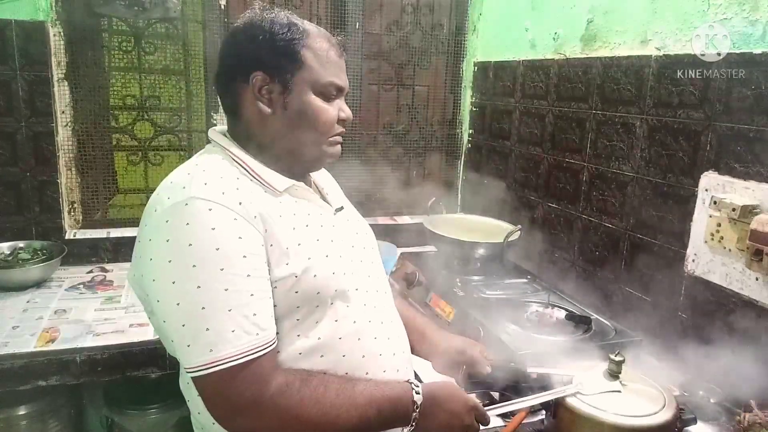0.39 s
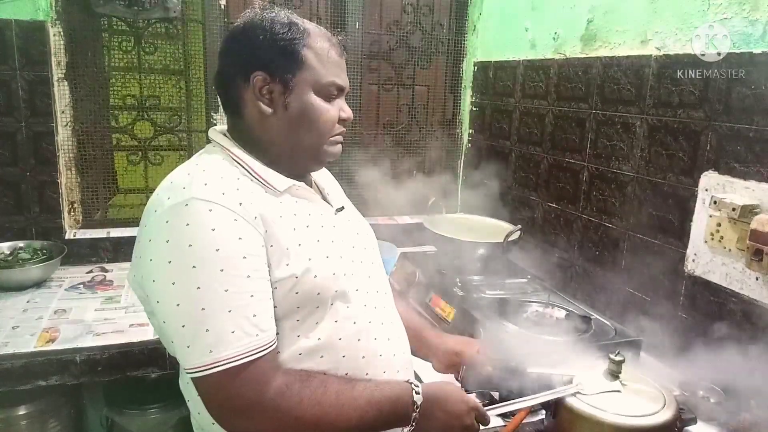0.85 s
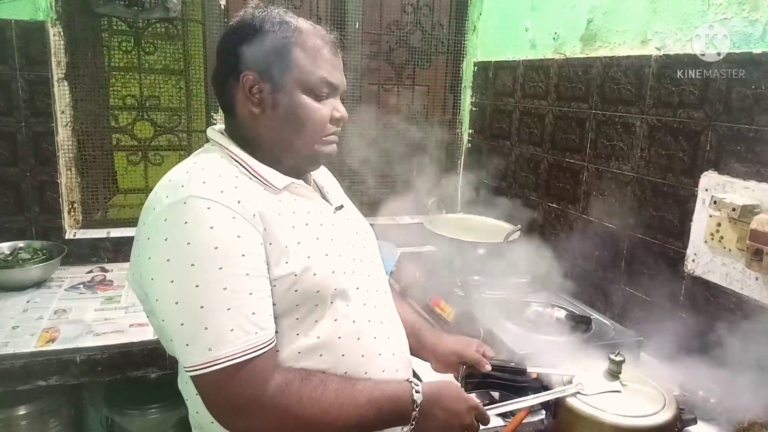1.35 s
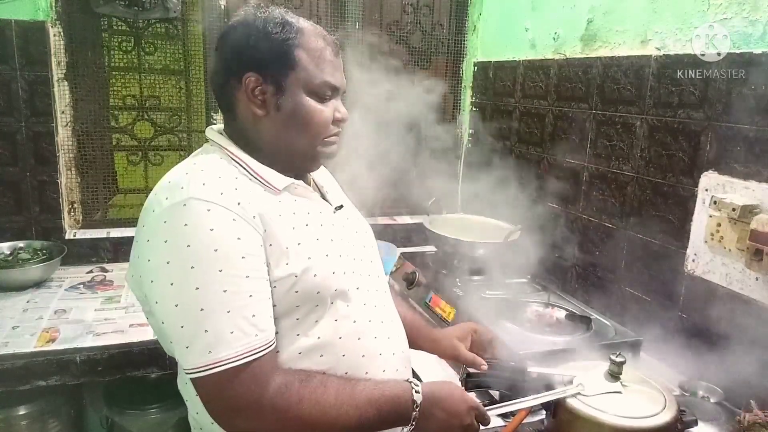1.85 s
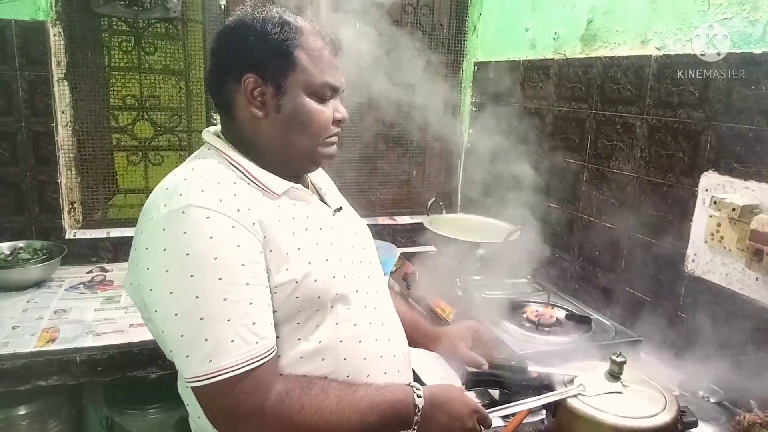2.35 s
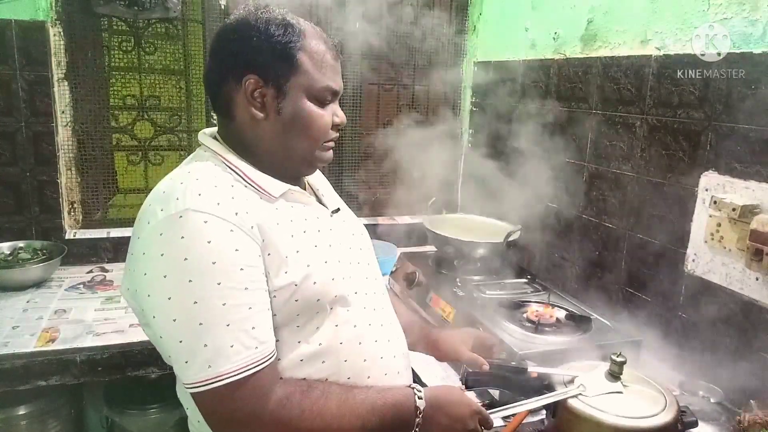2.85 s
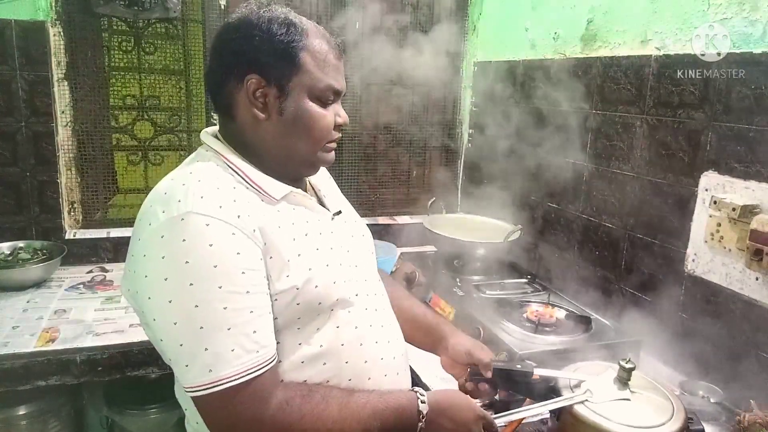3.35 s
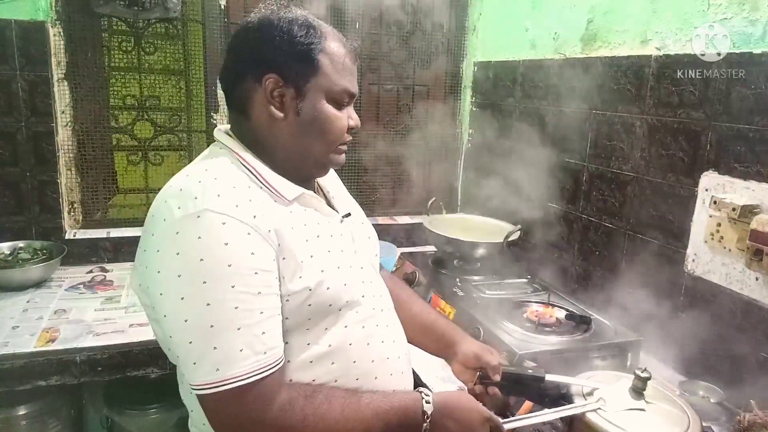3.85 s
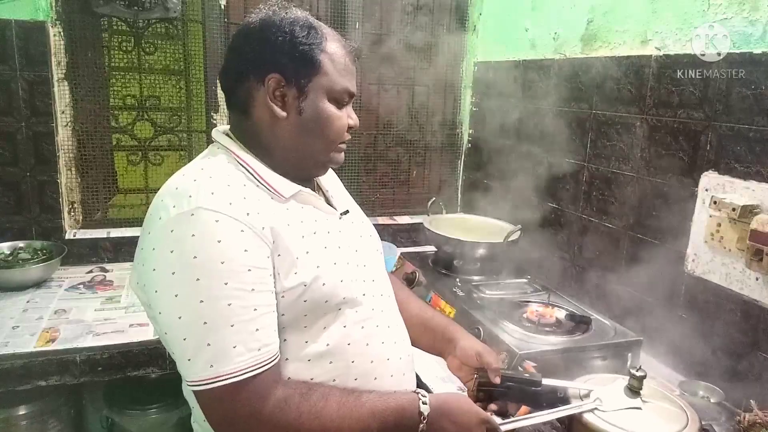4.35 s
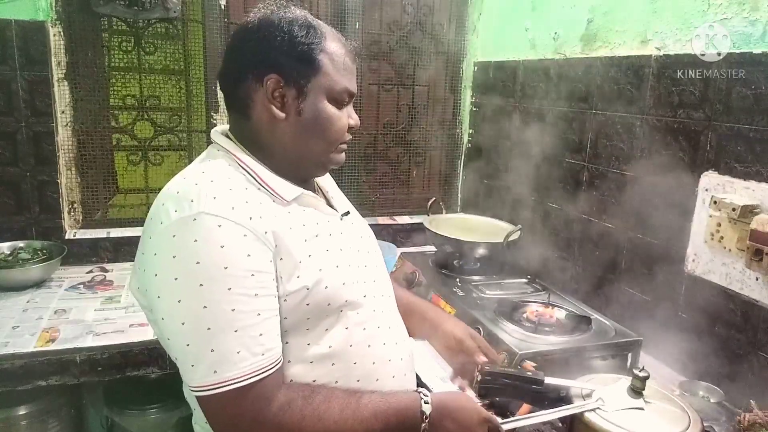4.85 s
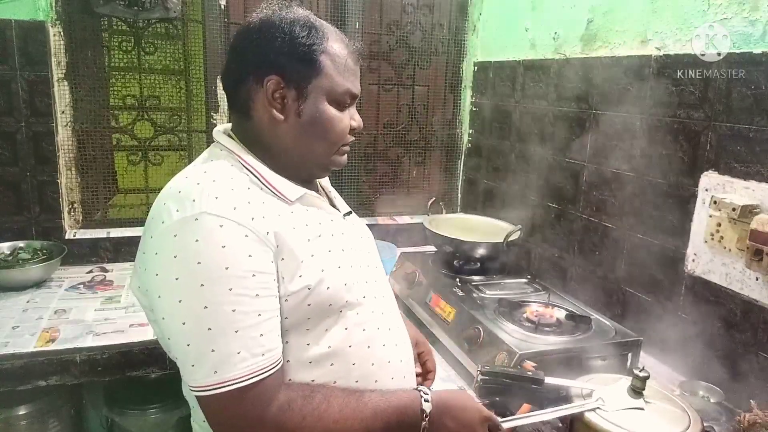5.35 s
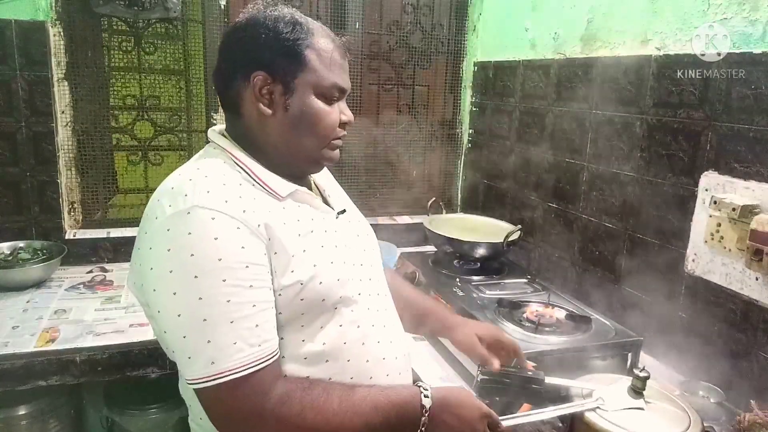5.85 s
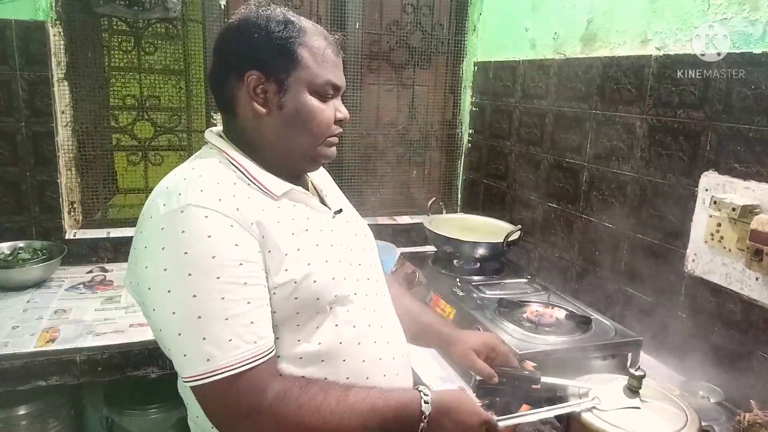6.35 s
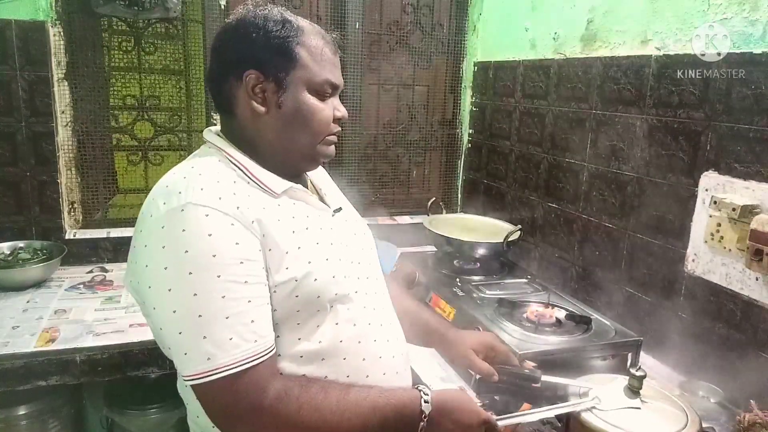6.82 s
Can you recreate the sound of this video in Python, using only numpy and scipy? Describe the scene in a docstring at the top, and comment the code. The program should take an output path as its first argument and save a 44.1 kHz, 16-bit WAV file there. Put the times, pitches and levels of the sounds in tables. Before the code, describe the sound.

A pressure cooker releases a sharp, dense rush of steam close to the microphone. It starts somewhat softer and uneven, broken by several low bubbling puffs under the lid, and swells within two seconds to a full continuous hiss. The hiss wavers slightly, duller around the middle, brighter later, and is still running at the end. Tiles and steel add a short metallic reflection; the stove flame is barely audible.

```python
"""Steam jet of a pressure cooker

Steam escapes under the lifted weight of a pressure cooker in a small tiled kitchen; both channels are alike.
The jet is noise coloured by resonances of vent, weight and metal; the pose of the weight shifts its colour.
Early on it sputters: low puffs ring the hollow under the lid, mostly while the hiss dips.
A gas burner and the house murmur beneath as low noise; random tails of tiles and steel comb the hiss finely.
"""
import sys
import numpy as np
from scipy import signal
from scipy.fft import rfft, irfft, next_fast_len
from scipy.io import wavfile
from scipy.ndimage import uniform_filter1d

SR = 44100
rng = np.random.default_rng(int(sys.argv[2]) if len(sys.argv) > 2 else 0)


def level_to_linear(level):
    """Convert decibel levels to linear amplitude factors, elementwise."""
    exponent = np.asarray(level, float) / 20
    return 10 ** exponent


def bounce(signal):
    """Save signal as a 16-bit WAV file at the path given by the first command-line argument."""
    frames = np.transpose(np.atleast_2d(signal))
    limited = np.clip(frames, -1, 1)
    pcm = np.round(limited * 32767).astype(np.int16)
    wavfile.write(sys.argv[1], SR, pcm)


N = 317961

# spectral density of burner and house before low-pass and scaling: f/Hz, relative level/dB
BURNER_COLOUR = [(15, -43), (25, -16), (48, -13), (75, -9.5), (128, -0.5), (147, 1.5), (168, -13),
                 (195, -2.5), (270, -5.5), (299, 0), (400, 2.5), (520, -31), (880, -120)]
# burner and house, level about which they flicker: t/s, level/dB
BURNER_LEVEL = [(0, -76), (.2, -76), (.3, -70), (.62, -71), (.72, -64), (1.0, -66.5), (7.21, -66.5)]
# slugs of water in the vent: start t/s, hold t/s, puff level/dB, change of hiss/dB, upper modes/dB
SLUGS = [(0.232, 0.17, -54.5, 0.5, -8), (0.647, 0.028, -47, -2, -1), (0.726, 0.03, -45.5, -2.5, -3),
         (1.078, 0.042, -43.5, -2, -8), (1.354, .07, -46.5, -1, 1), (1.575, .02, -44.5, -4.5, 0),
         (1.907, 0.039, -50.5, 0, -3), (2.26, .02, -49, -2.5, -4)]
# resonances of the hollow under the lid: f/Hz, width/Hz, relative level/dB
HOLLOW_MODES = [(196, 47, -10), (350, 27, -11), (480, 27, 1.5), (575, 53, -1), (687, 23, 3.5), (975, 40, 2),
                (960, 77, 1.5), (1270, 300, 3.5)]
# spectral density of the turbulent jet before its resonances: f/Hz, relative level/dB
JET_COLOUR = [(120, -72), (200, -33), (267, -33.5), (364, -30), (564, -25.5), (921, -20), (1010, -22),
              (1280, -12), (2010, -10), (2590, -3.5), (3000, -0.5), (5990, -11), (8300, -9), (13300, -15),
              (15400, -20.5)]
# broad resonances and dips of vent and weight: f/Hz, width/Hz, lift/dB
VENT = [(2980, 950, 1.5), (6330, 460, -1), (6940, 280, 4), (7070, 310, -4), (8070, 1300, 3),
        (9150, 460, -2.5), (10100, 840, 1.5), (10970, 500, -0.5), (13100, 1500, 1.5)]
# narrow rings and dips of lid, pans and steel hob: f/Hz, width/Hz, lift/dB
RINGS = [(660, 27, 2), (923, 23, 3.5), (1394, 10, 3), (2520, 10, -4), (2583, 30, 7), (3008, 41, 3.5),
         (3344, 30, 3.5), (4195, 30, 4.5), (4630, 27, 4.5), (5480, 28, 3), (5660, 37, 4.5), (6110, 25, 6.5),
         (6570, 34, 6.5), (6900, 30, 0.5), (7500, 30, -8)]
# pose of the lifted weight: t/s, brightness/dB, tilt/1, turn/1
POSE = [(0, -0.3, .5, -.3), (.3, 1.3, -0.19, -0.88), (.9, 1.5, -0.3, -.7), (1.6, 2, .3, -0.89),
        (2.0, 1, 1.1, -0.74), (2.7, -0.5, -.2, -1.1), (3.1, -1.8, 1, -0.9), (3.8, -3, 0, 0.36),
        (4.4, -0.5, -0.14, 0.25), (4.9, -1, 0.19, 1.3), (5.4, 1.5, 1.9, 2), (5.8, 1.4, 1.3, 1.5),
        (6.2, 1, -1.6, .9), (6.6, -1.5, -2.2, 0.11), (7.21, -1, -1.7, 0.27)]
# bands that shift with the pose: f/Hz, width/Hz, lift per brightness/(dB/dB), per tilt/dB, per turn/dB
POSE_BANDS = [(1480, 1800, 0.66, 0.5, -0.08), (3660, 540, 0, -0.1, 0.4), (4900, 810, 0, 1.3, -0.8),
              (6400, 430, 0.3, 1, 0.1), (7330, 400, 1.6, -1.8, -1.5), (8200, 800, 0, 1.2, -1),
              (9050, 500, -0.5, 2.4, -0.2), (9970, 710, 0.5, -0.7, 0.6), (11200, 770, 0, 1, -.1),
              (12200, 800, 1, -0.2, 0), (14600, 1200, 0.5, .9, 0.5)]
# jet without its sputters: t/s, level/dB
JET_LEVEL = [(0, -35), (.17, -37), (.3, -34.5), (.54, -31.5), (.76, -32.5), (.93, -28.5), (1.3, -30),
             (1.55, -31), (1.74, -27), (2.05, -28.5), (2.6, -27.5), (2.87, -28.5), (3.87, -26.5),
             (4.0, -28), (4.8, -29), (4.92, -26.5), (5.5, -30), (6.15, -29.5), (6.3, -29), (6.8, -28),
             (7.21, -27)]


def curve(table):
    """Linear interpolation: each column of a table becomes one value a sample."""
    s, *columns = np.transpose(table)
    return [np.interp(np.arange(N) / SR, s, column) for column in columns]


def shaped(x, gain):
    """Linear filtering: the spectrum is multiplied by a gain that is a function of frequency."""
    size = next_fast_len(len(x))
    hz = np.arange(size // 2 + 1) * SR / size + 1  # the offset avoids division by zero
    return irfft(rfft(x, size) * gain(hz), size)[:len(x)]


def colour(x, points):
    """Coloured noise: white noise takes a density interpolated over log frequency."""
    hz, db = np.transpose(points)
    return shaped(x, lambda f: level_to_linear(np.interp(np.log(f), np.log(hz), db)))


def band(x, hz, width):
    """Band-pass filtering: gain 1 in the middle, one half at the edges, steep beyond."""
    return shaped(x, lambda f: 1 / (1 + (2 * (f - hz) / width) ** 4))


def modes(f, table):
    """Incoherent superposition: the power responses of resonances add."""
    return np.sqrt(sum(level_to_linear(2 * db) / (1 + (2 * (f - hz) / width) ** 2) for hz, width, db in table))


def lifts(f, table):
    """Cascaded resonances: bell-shaped lifts and dips add in decibels."""
    return level_to_linear(sum(db / (1 + (2 * (f - hz) / width) ** 2) for hz, width, db in table))


def walk(rate):
    """Random fluctuation: levels drawn at a rate/Hz, smoothed twice; spread near 1."""
    hold = int(SR / rate)
    steps = np.repeat(rng.standard_normal(N // hold + 1), hold)
    smooth = uniform_filter1d(uniform_filter1d(steps, hold), hold)
    return 1.3 * smooth[:N]


def kitchen(x):
    """Reverberation: exponentially decaying noise tails of tiles and steel follow the direct sound."""
    t60_s, wet_db, spacing_s = 0.21, -9, 1.487
    t = np.arange(SR // 2) / SR
    decay = np.exp(-np.log(1000) * t / t60_s) * (t > .002)
    tails = rng.standard_normal((8, len(t))) * decay
    # pot and cook move, so one tail melts into the next
    place = np.arange(N) / SR / spacing_s
    wet = 0
    for k, tail in enumerate(tails):
        share = np.cos(np.pi / 2 * np.clip(place - k, -1, 1))
        unit_tail = tail / np.sqrt(np.sum(tail ** 2))
        wet = wet + share * signal.fftconvolve(x, unit_tail)[:N]
    return x + level_to_linear(wet_db) * wet


def burner():
    """Combustion noise: flame and house sound as low-passed noise that flickers slightly."""
    rumble = band(colour(rng.standard_normal(N), BURNER_COLOUR), 0, 605)
    return rumble / np.std(rumble) * level_to_linear(curve(BURNER_LEVEL)[0] + walk(6))


def sputters():
    """Two-phase flow: each slug rises, holds and lets go, setting puff gain, hiss change and upper modes."""
    attack_s, release_s = 0.02, 0.035
    after_db, after_s = -9, 0.55  # wet steam lingers after a slug
    start, hold, puff_db, dip_db, upper_db = np.transpose(SLUGS)[:, :, None]
    since = np.arange(N) / SR - start
    rise = np.clip(since / attack_s, 0, 1)
    past = np.maximum(since - attack_s - hold, 0)
    slug = rise * np.exp(-past / release_s)
    lingering = level_to_linear(after_db) * rise * np.exp(-past / after_s)
    power = (level_to_linear(puff_db) * (slug + lingering)) ** 2 + 1e-18
    total = power.sum(axis=0)
    return np.sqrt(total), (dip_db * slug).sum(axis=0), (upper_db * power).sum(axis=0) / total


def puffs(puff, upper_db):
    """Cavity resonance: wet gushes, as noise, ring the hollow under the lid."""
    def hollow(f):
        return modes(f, HOLLOW_MODES) / (1 + (f / 1600) ** 4) / (1 + (150 / f) ** 4)

    gush = shaped(rng.standard_normal(N), hollow)
    gush = gush / np.std(gush)
    gush = gush + (level_to_linear(upper_db) - 1) * band(gush, 1300, 620)
    return gush * puff * level_to_linear(walk(19))


def jet(puff, dip_db):
    """Turbulent jet noise: vent and metal colour the hiss, the weight's pose shifts it, droplets flutter it."""
    flutter_db, flicker_db = 0.31, 0.63
    bright_db, tilt, turn = curve(POSE)
    jet_db = curve(JET_LEVEL)[0] + dip_db
    # water in the vent chokes the treble while a puff passes
    choke_db = 2.2 * puff / level_to_linear(jet_db)
    hiss = colour(rng.standard_normal(N), JET_COLOUR)
    hiss = kitchen(shaped(hiss, lambda f: lifts(f, VENT + RINGS)))
    # the level refers to 2 to 6.5 kHz, before the pose acts
    hiss = hiss / np.std(band(hiss, 4250, 4500))
    # a faster jet lifts the treble, more so towards the top
    treble = shaped(hiss, lambda f: 1 / (1 + (5800 / f) ** 3.2))
    hiss = hiss + (level_to_linear(bright_db - choke_db + flicker_db * walk(8)) - 1) * treble
    for hz, width, by_bright, by_tilt, by_turn in POSE_BANDS:
        lift_db = by_bright * bright_db + by_tilt * tilt + by_turn * turn
        hiss = hiss + (level_to_linear(lift_db + flicker_db * walk(8)) - 1) * band(hiss, hz, width)
    return hiss * level_to_linear(jet_db + flutter_db * walk(12) + 0.19 * walk(40))


def scene():
    """Superposition: the pressures of all sources add at one microphone, which feeds both channels."""
    puff, dip_db, upper_db = sputters()
    mono = burner() + puffs(puff, upper_db) + jet(puff, dip_db)
    return np.tile(mono, (2, 1))


def top_cut(x):
    """Nothing passes above the cut-off."""
    return signal.sosfilt(signal.butter(12, 15670, fs=SR, output="sos"), x)


def record(dry):
    """Band limitation: a 20 Hz wide slope closes the spectrum at its top."""
    top_hz = 15530
    cut = np.array([shaped(side, lambda f: np.clip((top_hz - f) / 20, 0, 1)) for side in dry])
    return top_cut(cut)


dry = scene()
out = record(dry)
bounce(out)
```